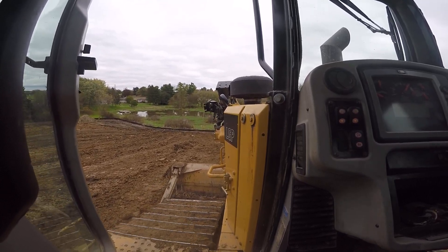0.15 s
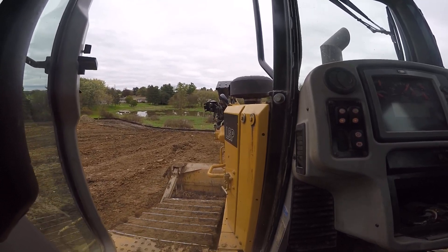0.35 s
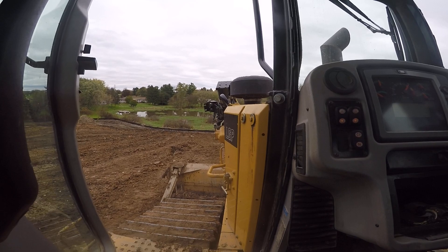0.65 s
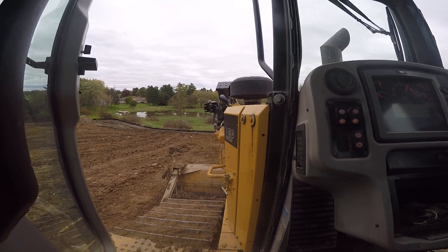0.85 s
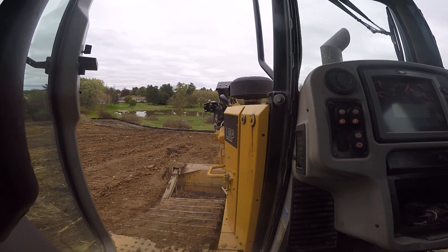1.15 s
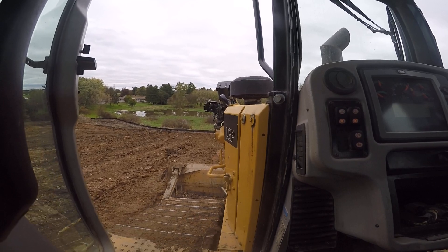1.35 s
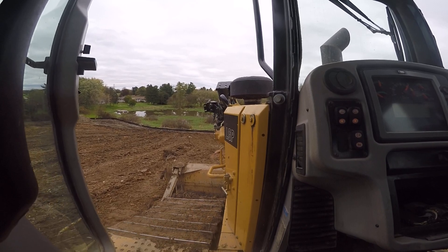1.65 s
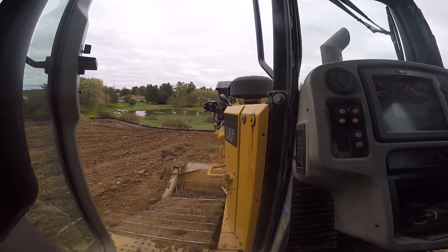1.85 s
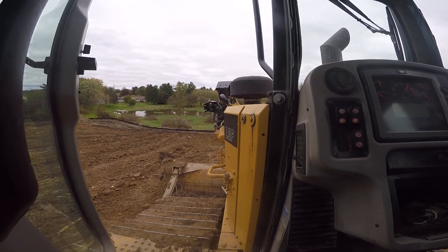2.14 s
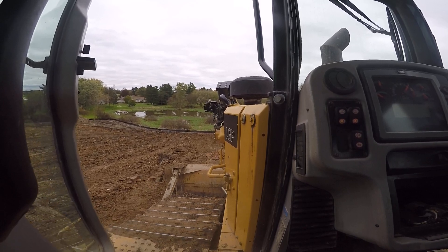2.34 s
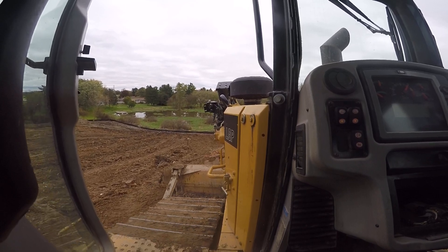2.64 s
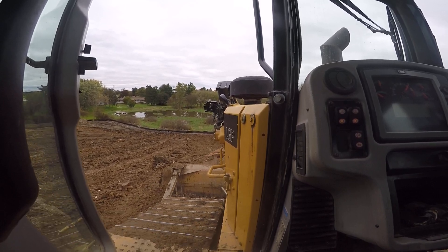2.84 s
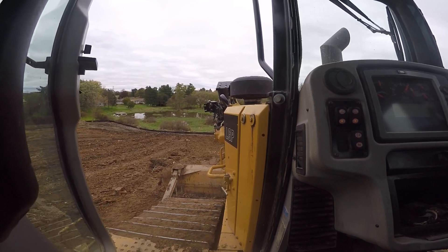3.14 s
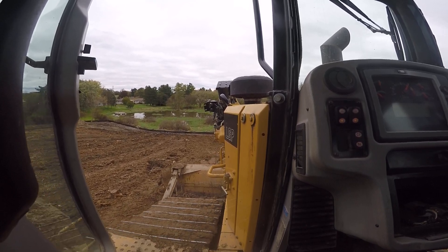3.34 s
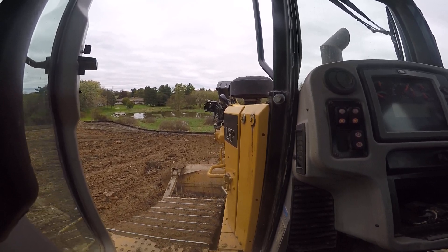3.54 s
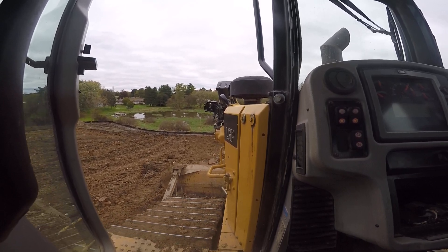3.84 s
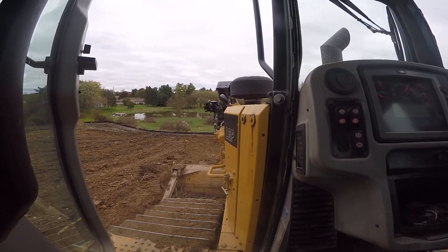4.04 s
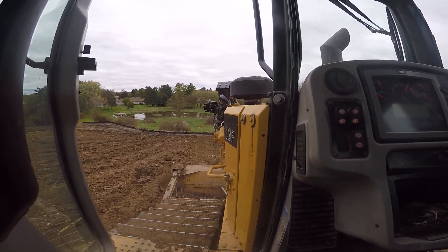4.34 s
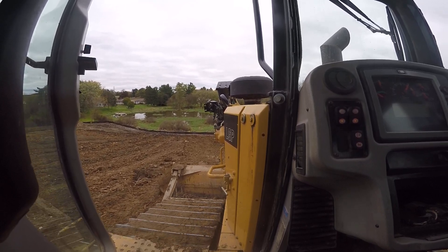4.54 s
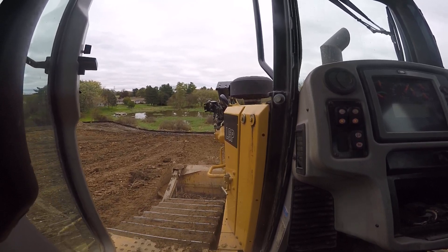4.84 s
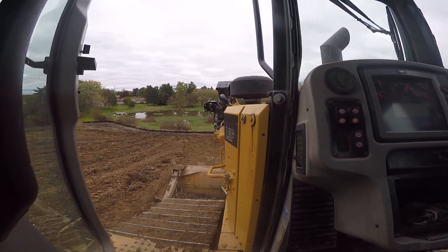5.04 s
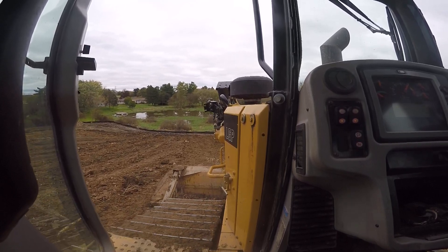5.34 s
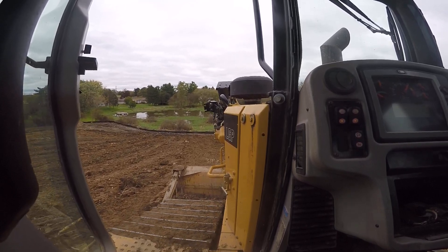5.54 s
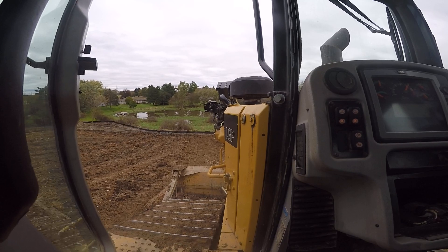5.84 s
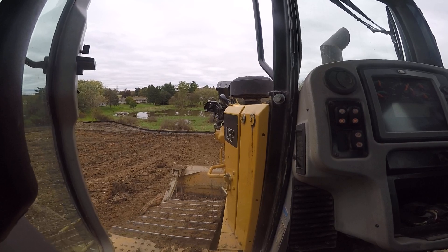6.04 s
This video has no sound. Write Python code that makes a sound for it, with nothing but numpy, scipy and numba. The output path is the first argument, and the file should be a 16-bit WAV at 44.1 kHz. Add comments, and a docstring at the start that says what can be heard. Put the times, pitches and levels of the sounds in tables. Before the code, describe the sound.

A close microphone in an enclosed bulldozer cab picks up continuous engine throb, grinding low rumble and gritty mechanical clatter. Track links thump the frame in quick, alternately softer and harder beats, with light irregular bumps between. A few tiny dry ticks come from loose fittings. A faint, wavering turbo whine sits far above, while the hollow low boom grows toward the end.

```python
"""Bulldozer cab, pushing soil

Heard from the seat at steady throttle: a six-cylinder diesel drones as summed engine orders and clatters
as noise bursts at each firing. A turbocharger whines faintly, a cab boom dips and then swells, soil rumbles.
Track links knock on the sprocket nearly five times a second as decaying modes of the frame; small ticks
fall between. A look-ahead limiter ducks under the loud peaks."""
import sys
import numpy as np
from scipy import signal
from scipy.fft import rfft, irfft
from scipy.io import wavfile
from scipy.ndimage import uniform_filter1d, minimum_filter1d, map_coordinates
from numba import njit

SR = 44100
rng = np.random.default_rng(int(sys.argv[2]) if len(sys.argv) > 2 else 0)


def to_wav(s):
    """Save 16-bit WAV."""
    ch = np.atleast_2d(s).T  # columns
    pcm = np.round(np.clip(ch, -1, 1) * 32767)  # PCM
    wavfile.write(sys.argv[1], SR, pcm.astype(np.int16))


N = 272538


def undb(db):
    """Decibels to gain."""
    return 10 ** (np.asarray(db) / 20)


def curve(table):
    """Rows of (time, value) joined by straight lines, one value per sample."""
    return np.interp(np.arange(N) / SR, *np.transpose(table))


def walk(knots_per_s):
    """Smooth random wandering with a spread of roughly 1."""
    knots = rng.standard_normal(256)
    position = np.arange(N) / SR * knots_per_s
    return 0.97 * map_coordinates(knots, [position], order=2, mode="wrap")


def colour(noise, spectrum, resonances):
    """Filter unit white noise to a broad power spectrum plus resonant peaks, in dB per Hz."""
    f = np.arange(N // 2 + 1) * SR / N + 1e-6  # offset avoids log(0)
    hz, db = np.transpose(spectrum)
    broad = undb(np.interp(np.log(f), np.log(hz), db)) ** 2
    power = broad / (1 + (f / hz[-1]) ** 8)
    for centre, width, peak_db in resonances:
        power = power + undb(peak_db) ** 2 / (1 + ((f - centre) / width) ** 2 * 2) ** 2
    return irfft(rfft(noise) * np.sqrt(power * SR / 2), N)


def add(out, start_s, sound):
    """Mix a short sound into out, cut at its end."""
    start = max(int(start_s * SR), 0)
    part = sound[:max(N - start, 0)]
    out[start:start + len(part)] += part


def rumble(flutter_db=0.76):
    """Tracks and blade grind through soil: fluttering noise shaped by the cab's resonances."""
    # running gear: freq_hz, level_db_per_hz
    gear_spectrum = [(8, -41.5), (20, -35.5), (45, -43), (80, -41), (110, -41), (180, -41), (235, -48),
                     (380, -51.5), (720, -48), (850, -54), (960, -68), (1500, -101)]
    # cab air and panel resonances: centre_hz, width_hz, level_db_per_hz
    cab_modes = [(49, 13, -36), (273.2, 13.9, -41), (324, 24, -52.5), (456, 52, -48), (553, 24, -51),
                 (639, 45, -47.5)]
    noise = rng.standard_normal(N) * undb(flutter_db * walk(14))
    return colour(noise, gear_spectrum, cab_modes)


def ticks(offset_db=-4.0, decay_s=0.0012, low_hz=5500):
    """Loose cab fittings tick: decaying noise bursts, high-passed."""
    # dry ticks: start_s, level_db (before offset_db)
    tick_rows = [(1.098, -36), (1.405, -36), (2.938, -40), (3.358, -33), (4.172, -30)]
    out, t = np.zeros(N), np.arange(SR // 50) / SR
    for start_s, level_db in tick_rows:
        burst = np.exp(-t / decay_s) * rng.standard_normal(len(t))
        add(out, start_s, undb(offset_db + level_db) * burst)
    return signal.sosfilt(signal.butter(2, low_hz, "high", fs=SR, output="sos"), out)


def turbo(flutter_db=2.5, jitter_hz=3, hiss_db=-55, hiss_half_width_hz=170, image_db=-21):
    """Blade tone in a band of hiss, swelling in resonances; its fainter sampling image glides opposite."""
    # mean blade tone: time_s, pitch_hz
    blade_tone = [(0, 9812), (1.25, 9620), (1.8, 9682), (3.1, 9718), (3.8, 9672), (4.45, 9520), (5, 9590),
                  (5.45, 9752), (6.18, 9900)]
    # resonances the tone glides through: centre_hz, width_hz
    whine_modes = [(9616, 70), (9770, 46)]
    mode_levels_db, base_db = (-46, -41.5), -61
    hz = curve(blade_tone)
    power = undb(base_db) ** 2
    for (centre, width), level_db in zip(whine_modes, mode_levels_db):
        power = power + undb(level_db) ** 2 / (1 + 2 * ((hz - centre) / width) ** 2) ** 2
    phase = 2 * np.pi * np.cumsum(hz + jitter_hz * walk(23)) / SR
    # image added by the recorder, at 24000 Hz minus the blade tone
    image_phase = 2 * np.pi * 24000 * np.arange(N) / SR - phase
    pair = np.sin(phase) + undb(image_db) * np.sin(image_phase)
    tone = np.sqrt(power) * undb(flutter_db * walk(25)) * pair
    # low-passed noise moved up to both sides of the tone
    lowpass = signal.butter(2, hiss_half_width_hz, fs=SR, output="sos")
    skirt = signal.sosfilt(lowpass, rng.standard_normal((2, N)))
    hiss = undb(hiss_db) * (skirt[0] * np.sin(phase) + skirt[1] * np.cos(phase)) / skirt.std()
    return np.sqrt(2) * tone + hiss


def boom(cycle, boom_db, noise_share=0.3):
    """Cab air booms at twice the firing rate; noise in one resonance follows part of its swell in dB."""
    # cab air resonance: centre_hz, width_hz, level_db_per_hz (before noise_share * boom_db)
    boom_mode = [(206, 23.6, -29.5)]
    tone = np.sqrt(2) * undb(boom_db) * np.sin(2 * np.pi * (12 * cycle + rng.random()))
    silence = [(10, -150), (1000, -150)]  # no broad spectrum under the resonance
    noise = colour(rng.standard_normal(N), silence, boom_mode)
    return tone + undb(noise_share * boom_db) * noise


def clatter(cycle, burst=0.14, decay_firings=0.32, cylinder_db=5.0, scatter_db=3.5):
    """Each firing sends a decaying noise burst through the block; the six cylinders differ in size."""
    # combustion and gears through the firewall: freq_hz, level_db_per_hz
    firewall_spectrum = [(600, -72.5), (940, -60), (1020, -53), (1300, -52), (1620, -58), (1850, -57.5),
                         (2150, -62), (2800, -65.5), (3250, -71), (4400, -70), (6300, -75.5), (7500, -85),
                         (9500, -87), (10600, -101)]
    # ringing engine covers: centre_hz, width_hz, level_db_per_hz
    cover_modes = [(1738, 23, -54.5), (2276, 43, -57.5)]
    # faint hiss at the very top: freq_hz, level_db_per_hz
    air_spectrum = [(11000, -115), (11900, -99), (13200, -93.5), (15000, -102)]
    firing, age = np.divmod(6 * cycle, 1)
    firing = firing.astype(int)
    size_db = cylinder_db * rng.standard_normal(size=6)[firing % 6]
    size_db = size_db + scatter_db * rng.standard_normal(size=1024)[firing]
    gate = 1 + burst * undb(size_db) * np.exp(-age / decay_firings)
    bursts = rng.standard_normal(N) * gate / np.sqrt(np.mean(gate ** 2))
    return colour(bursts, firewall_spectrum, cover_modes) + colour(bursts, air_spectrum, [])


def drone(cycle, waver_db=0.3, sway_rad=0.028, spread_turns=0.28):
    """Engine orders, loosely in step so each cycle throbs; level and phase waver a little."""
    # order (multiple of cycle rate; 2 crankshaft, 6 firing), mean level_db (rms)
    order_levels = [(1, -26), (2, -25), (3, -22), (4, -27.5), (6, -19.5), (7, -22.5), (9, -22), (10, -29.5),
                    (13, -30), (15, -38), (17, -46.5), (19, -37.5), (21, -42)]
    out = np.zeros(N)
    for order, level_db in order_levels:
        turns = order * cycle + spread_turns * rng.standard_normal()  # random start phase per order
        phase = 2 * np.pi * turns + sway_rad * walk(11)
        out += np.sqrt(2) * undb(level_db + waver_db * walk(2.88)) * np.sin(phase)
    return out


def knocks(first_link_s=0.0568, uneven_db=1.5):
    """Links meet the sprocket at track pace, soft and hard in turn: rows of (start_s, strength_db)."""
    # held until the next row; a brief lurch, then the soil slows the machine: time_s, links_per_s
    track_speed = [(0, 4.746), (.69, 5.01), (.889, 4.729), (4.272, 4.6), (4.707, 4.474)]
    # track tension sets how hard links knock: time_s, strength_db (before uneven_db)
    tension = [(0, 1.5), (.68, 9.5), (1.3, 4), (1.93, 7), (2.17, -4), (3.05, 5.5), (4.27, 1), (4.6, -5.5),
               (6.18, -2.5)]
    t = np.arange(first_link_s, N / SR, 1 / SR)
    since_s, links_per_s = np.transpose(track_speed)
    links = np.cumsum(links_per_s[np.searchsorted(since_s, t) - 1]) / SR
    rows = []
    for link, start_s in enumerate(np.interp(np.arange(links[-1]), links, t)):
        strength_db = np.interp(start_s, *np.transpose(tension))
        rows.append((start_s, strength_db - uneven_db * (-1) ** link))
    return rows


def tracks(offset_db=-5, contact_s=0.001724, detune=0.011, scatter_db=1.0, roller_db=-23, bump_count=70):
    """Links ring the track frame, rollers bump lightly at random; rubber mounts round the attack."""
    # track frame and cab floor: nominal freq_hz, relative level_db, t60_s
    frame_modes = [(55.56, -12.5, 0.58), (111.5, -11.5, 0.25), (182, -10, 0.13), (320.6, -6, 0.07),
                   (446, -13.5, 0.087), (609.3, -5, 0.084), (667, -2, 0.035), (750, -23, 0.012)]
    out, t = np.zeros(N), np.arange(SR // 4) / SR
    hz, mode_db, t60_s = np.transpose(frame_modes)[:, :, None]
    attack = 1 - np.exp(-(t / contact_s) ** 2)
    decay = np.exp(-np.log(1000) * t / t60_s)
    bumps = [(when * N / SR, roller_db + 6 * size) for when, size in rng.random((bump_count, 2))]
    for start_s, strength_db in knocks() + bumps:
        pitch, size = rng.standard_normal((2, len(frame_modes), 1))
        # every mode crosses zero together at contact_s
        swing = np.sin(2 * np.pi * hz * (1 + detune * pitch) * (t - contact_s))
        ring = undb(mode_db + scatter_db * size) * decay * swing
        add(out, start_s, undb(offset_db + strength_db) * attack * ring.sum(axis=0))
    return out


def scene():
    """Engine, running gear and cab, heard from the seat."""
    # four-stroke engine speed: time_s, cycles_hz
    engine_speed = [(0, 16.81), (.9, 16.81), (1.45, 16.72), (3.95, 16.79), (5, 16.65), (6.18, 16.73)]
    # cab boom: time_s, level_db (rms)
    boom_level = [(0, -39), (.9, -59), (1.55, -27.5), (3.4, -26.5), (4.6, -22), (5.2, -16.5), (6.18, -17.5)]
    cycle = np.cumsum(curve(engine_speed)) / SR
    engine = turbo() + boom(cycle, curve(boom_level)) + clatter(cycle) + drone(cycle)
    return (rumble() + ticks() + engine + tracks())[None]


@njit
def hold(x, fall):
    """Follow rises at once and sink back exponentially."""
    y, level = np.empty(len(x)), 0.
    for i in range(len(x)):
        level = max(x[i], level * fall)
        y[i] = level
    return y


def record(dry, drive_db=1.66, threshold=0.82, ratio=15.0, release_s=0.037, top_hz=15000):
    """A limiter looking 4 ms ahead holds the peaks down; a steep low-pass cuts the top."""
    x, ahead = dry[0] * undb(drive_db), SR // 250
    over_db = 20 * np.log10(np.maximum(np.abs(x) / threshold, 1)) * (1 - 1 / ratio)
    held_db = hold(over_db, np.exp(-1 / (release_s * SR)))
    # centred minimum and mean: the gain falls smoothly before the peak
    gain_db = uniform_filter1d(minimum_filter1d(-held_db, ahead), ahead)
    lowpass = signal.ellip(10, .1, 90, top_hz, fs=SR, output="sos")
    return signal.sosfilt(lowpass, x * undb(gain_db))[None]


dry = scene()
out = record(dry)
to_wav(out)
```